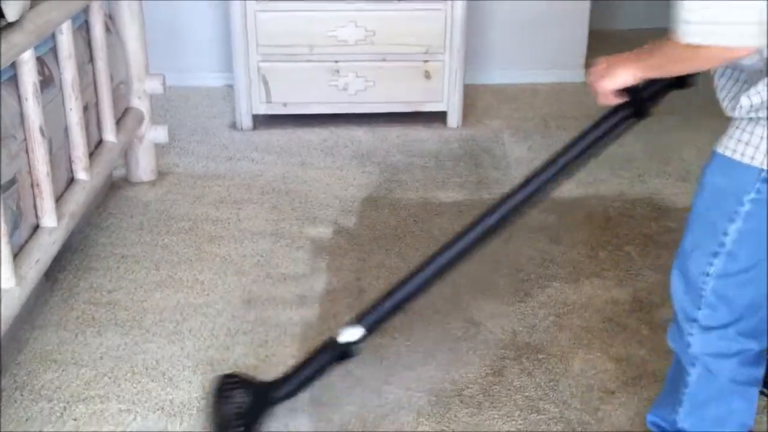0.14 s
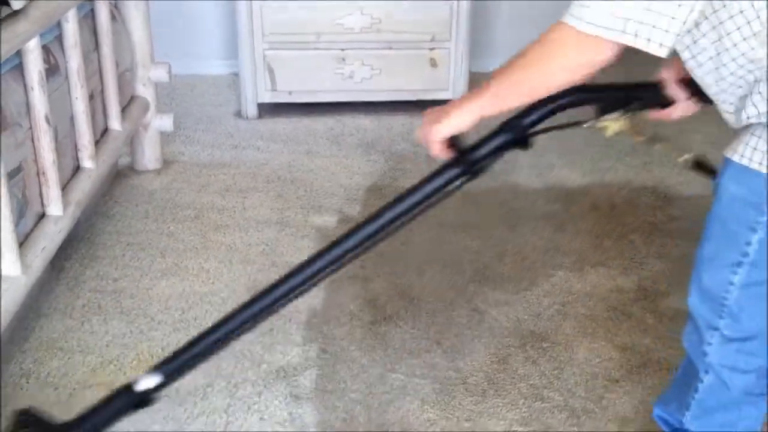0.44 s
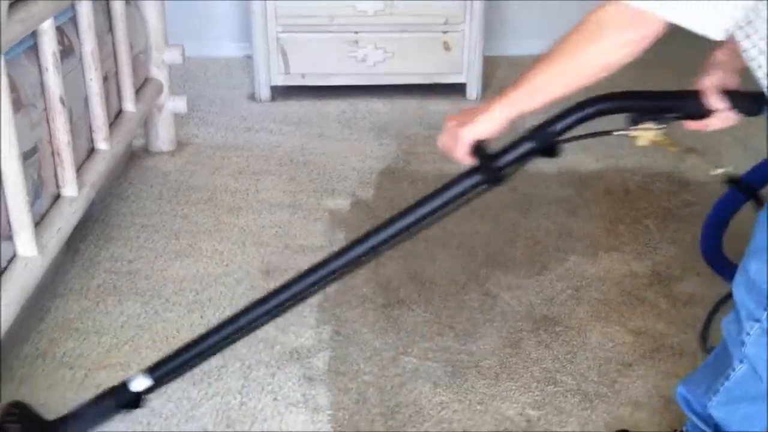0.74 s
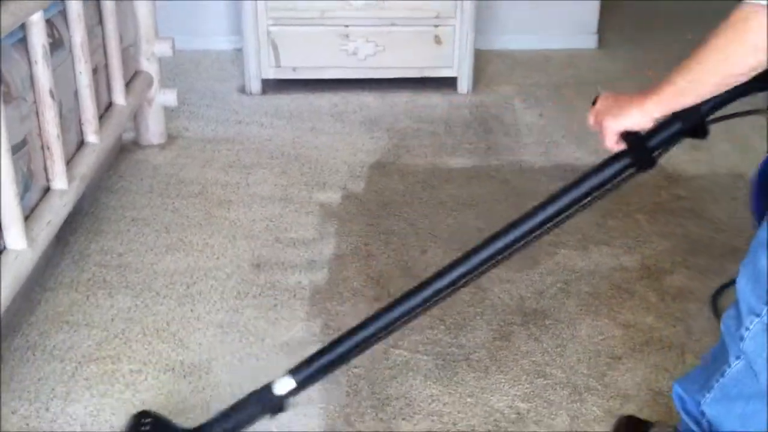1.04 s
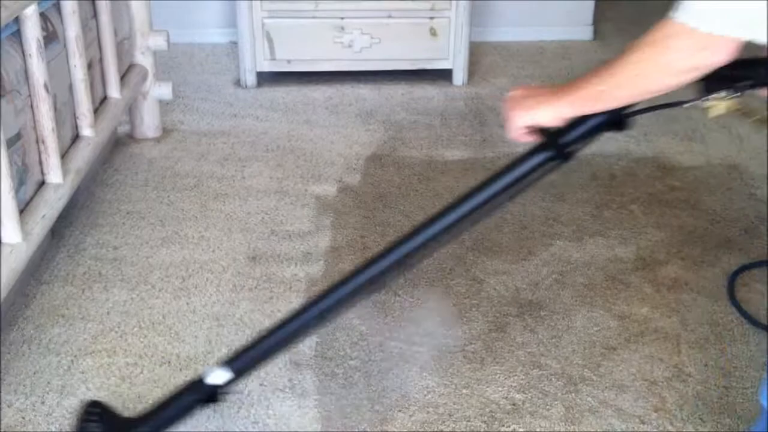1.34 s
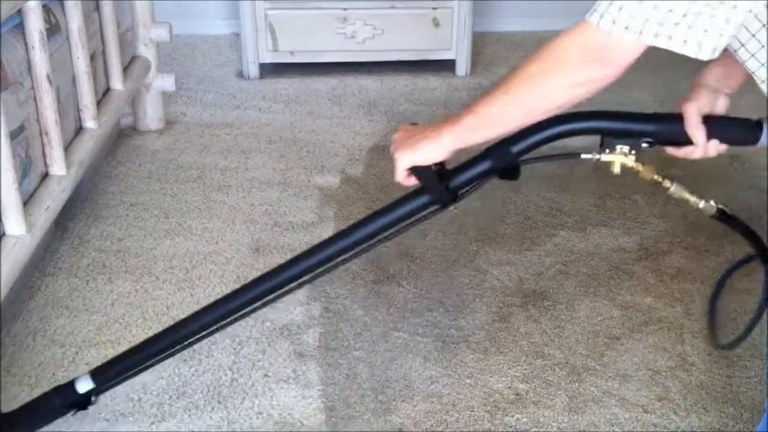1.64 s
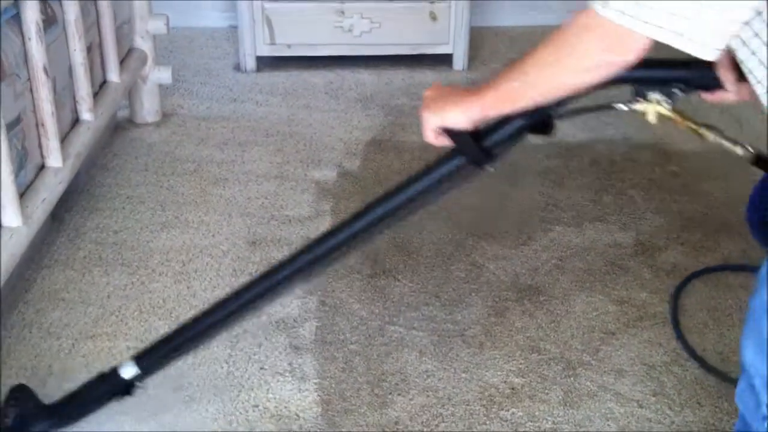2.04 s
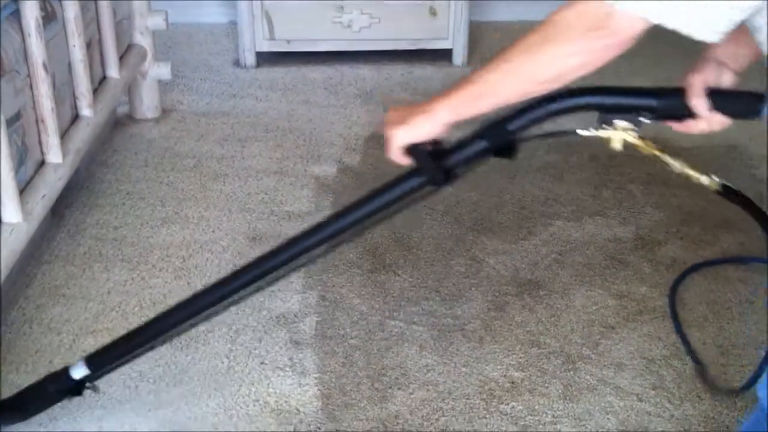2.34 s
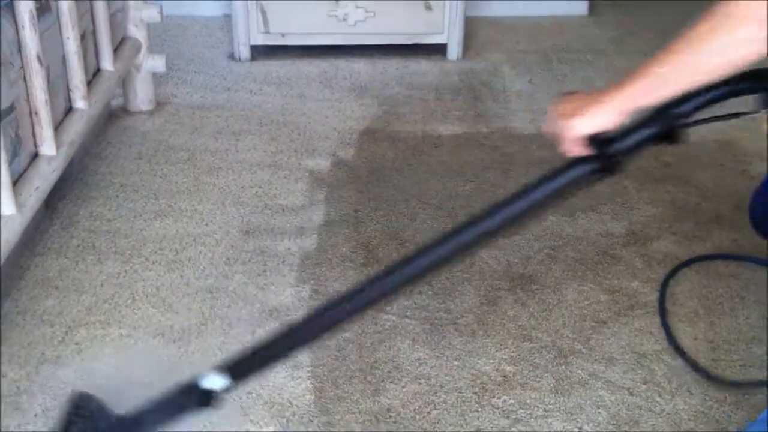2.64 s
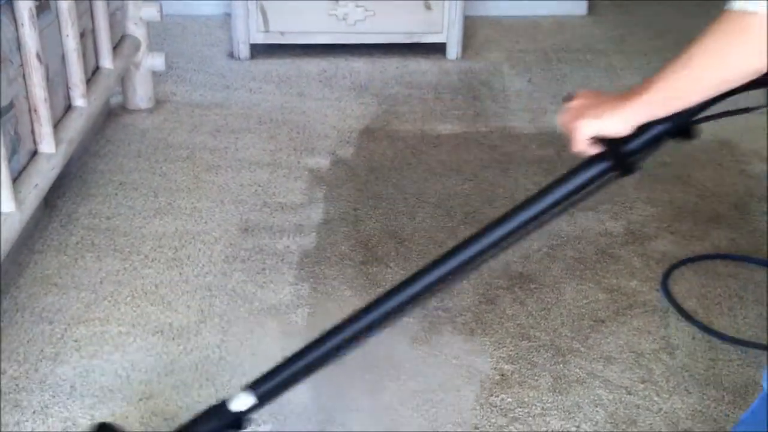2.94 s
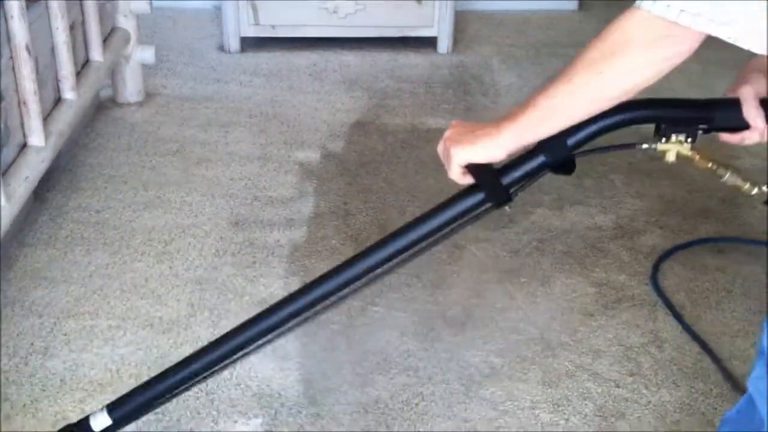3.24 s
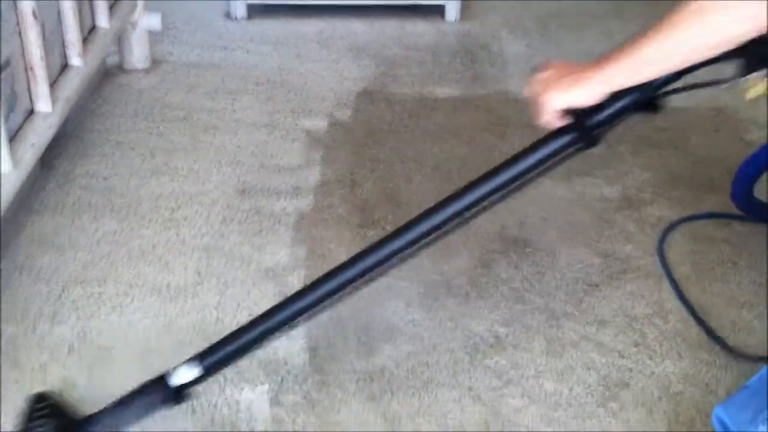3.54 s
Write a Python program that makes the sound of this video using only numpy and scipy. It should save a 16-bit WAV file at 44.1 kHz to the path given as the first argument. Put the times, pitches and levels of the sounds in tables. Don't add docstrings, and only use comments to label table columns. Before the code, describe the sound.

A carpet cleaning machine hums continuously from beyond the wall, with hose air roaring close by; the wand scrapes wet carpet in strokes, hisses and faintly whistles, then squeaks near the end, in one room microphone.

```python
import sys
import numpy as np
from scipy import signal
from scipy.io import wavfile
from scipy.ndimage import uniform_filter1d

SR = 44100
rng = np.random.default_rng(int(sys.argv[2]) if len(sys.argv) > 2 else 0)


def dump(signal):
    limited = np.clip(np.atleast_2d(signal).T, -1, 1)
    pcm = np.round(limited * 32767).astype(np.int16)
    wavfile.write(sys.argv[1], SR, pcm)


def ratio_of_db(decibels):
    return 10 ** (np.asarray(decibels, float) / 20)


N = 163170

# time_s, lobe_pass_hz, level_db, upper_partials_db
BLOWER = [(0, 287.6, -24, 1.5), (.5, 287.2, -22.5, .5), (.7, 285.8, -23, -3), (.95, 286.4, -21.5, -3),
          (1.2, 286.3, -22.5, .5), (1.85, 286, -24, 2.5), (2.15, 286.6, -22, 1), (2.45, 287, -23, 0.9),
          (2.8, 286.7, -21.5, 0.2), (3.05, 287, -22, 0.8), (3.28, 287.4, -24, -0.5), (3.7, 288, -22.5, 2.5)]
# multiple_of_lobe_pass, level_db, slow_waver_db
LOBE_ORDERS = [(1, 0.1, .3), (2, -6.5, .7), (3, -25, 3), (4, -27, 3), (6, -27.5, 5), (7, -33, 3),
               (8, -34, 3), (.75, -22, 3), (2.25, -25.5, 3), (2.5, -25, 3), (7.5, -34, 3)]
# multiple_of_engine_cycle, level_db, slow_waver_db
ENGINE_ORDERS = [(3, -53.5, 0), (4, -68, 1.5), (5, -54.5, 6), (6, -40.5, 0.4), (7, -43, 0.5), (9, -42, -1),
                 (15, -43, 1), (16, -59, 6), (18, -63.5, 5.5)]
ENGINE_CYCLE_HZ = 23.97
# frequency_hz, density_db
ROAR = [(30, -30), (100, -16), (190, -5.5), (330, -2.5), (490, -7), (800, -5.5), (2100, -8), (2900, -19.5)]
# time_s, pile_scrape_db, spray_hiss_db, drag_rumble_db
STROKES = [(0, -10, 2.4, -2), (.26, -9, .9, -4), (.4, 3.5, 1.3, 1.5), (.64, 3.2, .9, 1.1),
           (.74, -10, -.5, -8), (.95, -3, -.6, -3), (1.06, .8, -.4, 2), (1.3, -9, 1.2, -6),
           (1.7, -9, -2.1, -9), (1.95, -4, -.8, .5), (2.1, -9, -.5, -2.5), (2.28, -7, .3, -4),
           (2.45, -10, -1.5, 2.5), (2.85, -2, -.8, -.5), (3.05, -7, .6, -3), (3.18, -1.5, .1, -5),
           (3.45, -8, -.8, -1), (3.7, -2, .5, -3)]
# frequency_hz, density_db
SCRAPE = [(150, -25), (350, -10), (600, 1.5), (900, 1), (1300, -5.5), (2000, -5.5), (3500, -22),
          (6000, -13)]
# frequency_hz, width_hz, level_db
RUMBLE = [(181, 25, -42), (233.4, 17, -42.5), (306, 16, -42.5), (390.4, 26, -46.5), (696, 40, -46),
          (801.5, 16, -42.5), (1018, 34, -43.5)]
# frequency_hz, density_db
HISS = [(1800, -20.5), (2600, -4.5), (3500, -1.5), (4200, -4), (6500, -1.5), (9000, -4), (11500, -10),
        (14500, -24)]
WHISTLE_HZ = [7662, 7783, 7820, 7938, 8367, 7445, 7720]
# width_hz, level_db, loudest_s, swell_s, away_from_swell_db
WHISTLES = [(30, -42, 1.6, .3, -7), (24, -43, .9, 1.3, -4), (35, -43.5, 2.95, .25, -6),
            (12, -43, 2.25, .18, -9), (8, -46, 2.5, .09, -16), (40, -48, .2, .3, -10),
            (60, -45, .3, .5, -5)]
# start_s, length_s, pitch_hz, width_hz, level_db
SQUEAKS = [
    (3.459, .01, 3320, 250, -31.5),
    (3.459, .007, 3520, 200, -39),
    (3.476, .011, 3300, 150, -33.5),
    (2.678, .016, 4900, 250, -36),
    (3.423, .008, 4550, 250, -39),
    (1.955, .055, 3500, 500, -41),
]
# frequency_hz, share_of_cells_silent
TREBLE_GAPS = [(10000, 0), (12000, .07), (13200, .25), (14300, .6), (15000, .5), (15800, .6)]


def read(points, hz):
    f, value = np.transpose(points)
    return np.interp(np.log(hz + 1), np.log(f + 1), value)


def evened(x):
    return x / np.sqrt(np.mean(x ** 2) + 1e-20)


def control(table, column):
    rows = np.array(table, float)
    return np.interp(np.arange(N) / SR, rows[:, 0], rows[:, column])


def slow(top_hz):
    t = np.arange(0, N + 200, 200) / SR
    f = np.geomspace(top_hz / 20, top_hz, num=16)[:, None]
    sines = np.sin(2 * np.pi * (f * t + rng.random((16, 1))))
    wander = (sines / np.sqrt(f)).sum(0)
    return np.interp(np.arange(N) / SR, t, evened(wander))


def air(spectrum, patchy_db):
    frames = N // 512 + 5
    hz = np.fft.rfftfreq(2048, 1 / SR)
    real, imaginary, patches = rng.standard_normal((frames, 1025, 3)).T
    patches = uniform_filter1d(patches, size=20, axis=0)
    patches = evened(uniform_filter1d(patches, size=8, axis=1))
    above_db = np.where(hz > 1.3 * spectrum[-1][0], -30, 0)
    colour_db = read(spectrum, hz) + above_db
    cells = (real + 1j * imaginary) * ratio_of_db(colour_db[:, None] + patchy_db * patches)
    return evened(signal.istft(cells, nperseg=2048, noverlap=1536)[1][:N])


def resonate(x, hz, width_hz):
    turn = np.exp(2j * np.pi * hz * np.arange(len(x)) / SR)
    r = np.exp(-np.pi * width_hz / SR)
    return 2 * (turn * signal.lfilter([1 - r], [1, -r], x / turn)).real


def ringing(hz, width_hz):
    once = resonate(rng.standard_normal(N), hz, width_hz)
    return evened(resonate(once, hz, 2 * width_hz))


def partials(turns, orders, drift, upper_db=0):
    out = np.zeros(N)
    for k, db, waver_db in orders:
        level = np.sqrt(2) * ratio_of_db(db + upper_db * (k > 1) + waver_db * slow(top_hz=9.0))
        waver = drift * np.sqrt(k) * slow(top_hz=5.0)
        scatter = (k > 2) * rng.random()
        out = out + level * np.sin(waver - 2 * np.pi * (k * turns + scatter))
    return out


def blower():
    turns = np.cumsum(control(BLOWER, column=1)) / SR
    pulses = partials(turns, LOBE_ORDERS, drift=0.11, upper_db=control(BLOWER, column=3))
    return ratio_of_db(control(BLOWER, column=2)) * pulses


def engine():
    turns = ENGINE_CYCLE_HZ * np.arange(N) / SR + rng.random()
    return partials(turns, ENGINE_ORDERS, drift=0.038)


def hose_roar():
    return ratio_of_db(-30.5 + 0.46 * slow(top_hz=2.86)) * air(ROAR, patchy_db=1.5)


def spray_hiss():
    spray_db = control(STROKES, column=2)
    hiss = ratio_of_db(-32.5 + 0.5 * spray_db) * air(HISS, patchy_db=1.66)
    hz, width_hz = 7870, 680
    spray = [(900, -66), (hz - 3 * width_hz, -19), (hz - width_hz, -8.5), (hz, 0.1),
             (hz + width_hz, -7.5), (hz + 3 * width_hz, -21), (15000, -62)]
    return hiss + ratio_of_db(-34.5 + 1.44 * spray_db) * air(spray, patchy_db=2.0)


def slot_whistles():
    t = np.arange(N) / SR
    out = np.zeros(N)
    for hz, (width_hz, db, loudest_s, swell_s, away_db) in zip(WHISTLE_HZ, WHISTLES):
        swell = np.exp(-0.5 * ((t - loudest_s) / swell_s) ** 2)
        out = out + ratio_of_db(db + away_db * (0.5 - swell)) * ringing(hz, width_hz)
    return out


def pile_scrape():
    return ratio_of_db(-33 + control(STROKES, column=1)) * air(SCRAPE, patchy_db=1.5)


def drag_rumble():
    modes = sum(ratio_of_db(db) * ringing(hz, width_hz) for hz, width_hz, db in RUMBLE)
    return ratio_of_db(control(STROKES, column=3)) * modes


def squeaks():
    out = np.zeros(N)
    for start_s, length_s, hz, width_hz, db in SQUEAKS:
        t = np.arange(0, length_s + 0.01, 1 / SR)
        attack = np.minimum(t / 0.002, 1)
        release = ratio_of_db(-np.maximum(t - length_s, 0) * 4500.0)
        tone = 1.2 * np.sin(2 * np.pi * hz * t) + 0.4 * ringing(hz, width_hz)[:len(t)]
        out[round(start_s * SR):][:len(t)] += ratio_of_db(db) * attack * release * tone
    return out


def scene():
    machine = blower() + engine() + hose_roar()
    wand = spray_hiss() + slot_whistles() + pile_scrape() + drag_rumble()
    mix = machine + wand + squeaks()
    return np.array([mix, mix])


def low_pass(x):
    return signal.sosfilt(signal.butter(12, 15730, fs=SR, output="sos"), x)


def record(dry):
    hz, t, cells = signal.stft(dry, SR, nperseg=2048, noverlap=1536)
    field = rng.standard_normal((len(t), len(hz))).T
    field = uniform_filter1d(field, size=9, axis=0)
    field = uniform_filter1d(field, size=7, axis=1)
    rank = field.argsort(1).argsort(1) / len(t)
    share = read(TREBLE_GAPS, hz)[:, None]
    still_open = cells * (rank >= share) / np.sqrt(1 - share)
    patchy = signal.istft(still_open, SR, nperseg=2048, noverlap=1536)[1][:, :N]
    return low_pass(patchy)


dry = scene()
out = record(dry)
dump(out)
```